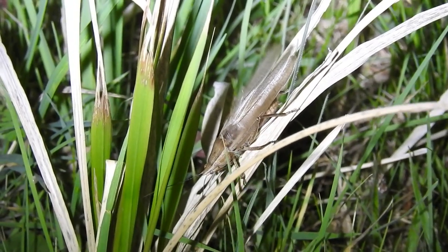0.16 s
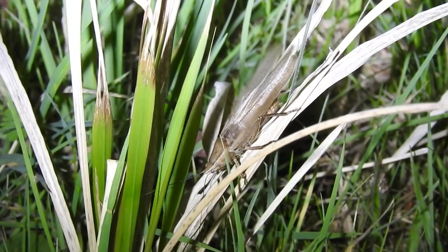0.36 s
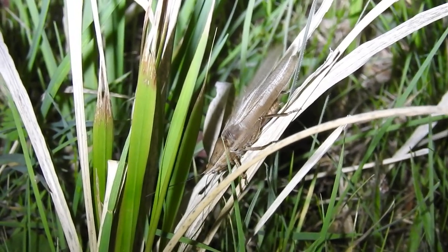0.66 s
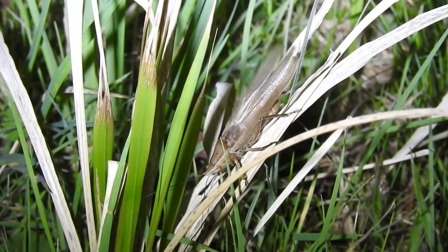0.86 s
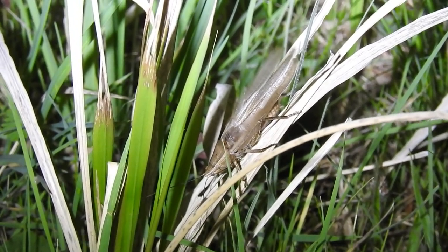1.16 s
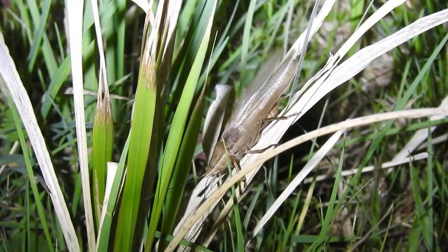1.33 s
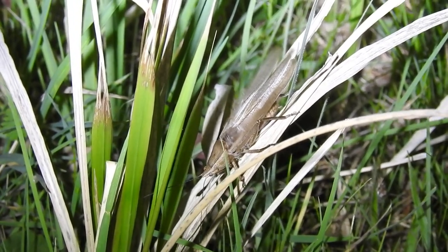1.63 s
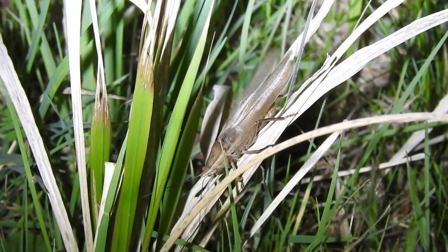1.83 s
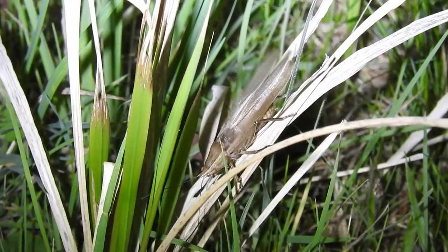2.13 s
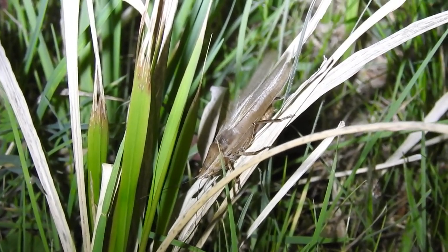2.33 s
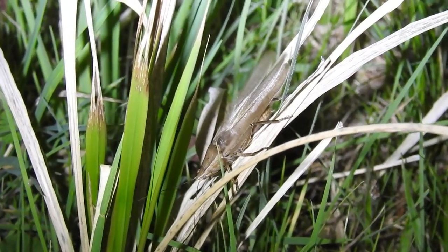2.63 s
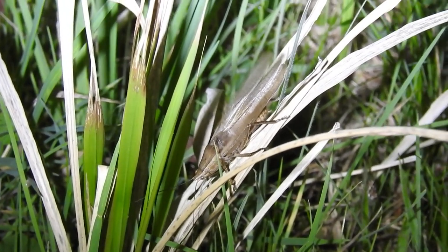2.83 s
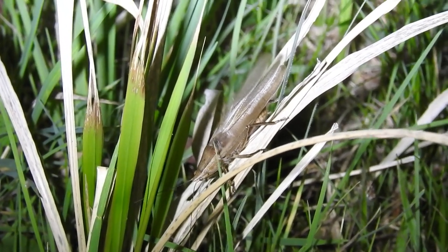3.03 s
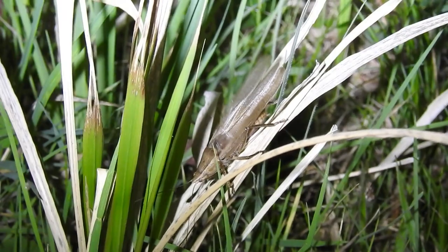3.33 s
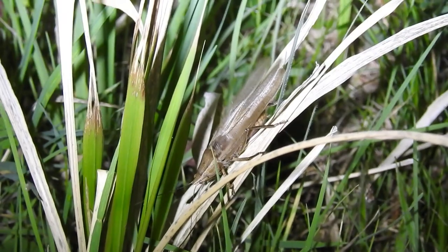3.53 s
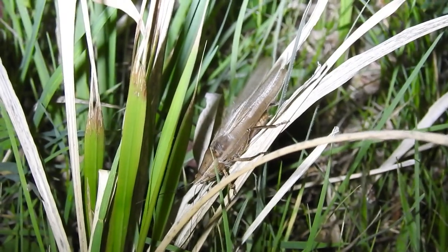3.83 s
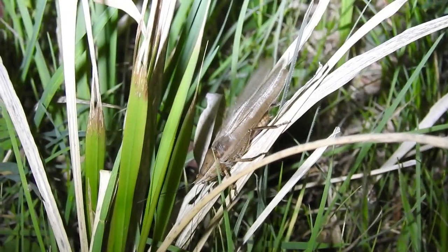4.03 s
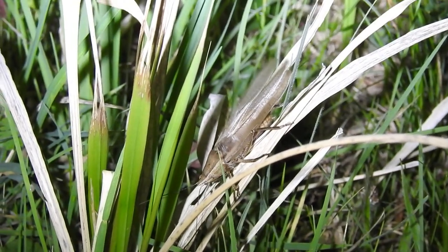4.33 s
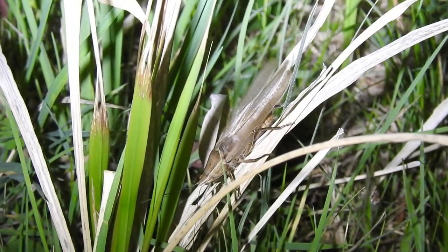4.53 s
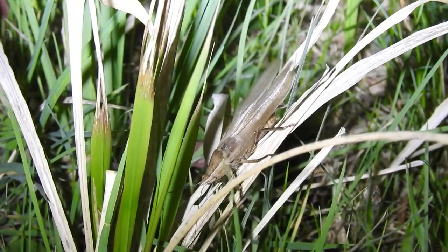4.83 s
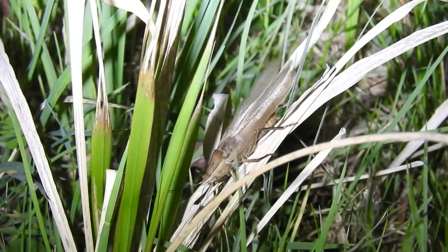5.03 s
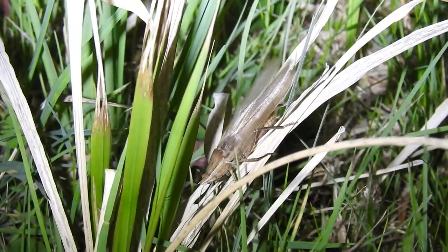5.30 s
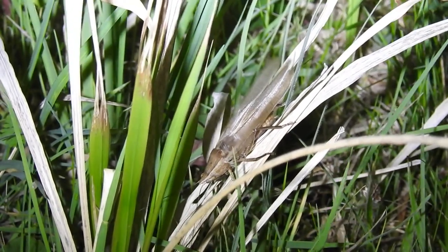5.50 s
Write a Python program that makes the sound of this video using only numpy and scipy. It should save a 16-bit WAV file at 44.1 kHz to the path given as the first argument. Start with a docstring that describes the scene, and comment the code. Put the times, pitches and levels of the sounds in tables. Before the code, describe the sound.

A katydid among grass blades buzzes close to the microphone from beginning to end, about eighty-two strokes a second fused into a harsh, bright drone. Each stroke is a tiny falling whistle with dry scraping grit. Pace and loudness hardly change; small irregular catches roughen it. Underneath lie a faint low wing hum, thin hiss and distant rumble. Outdoors at night, open and dry, in stereo, with only faint grassy echoes.

```python
"""A katydid sings close by in tall grass at night, about 82 wing beats a second.
Each closing stroke drags a scraper over a file: a short whistle sweeps from about 10 down to 7 kHz, then up a little.
Skids on landing, a light brush between strokes, dry grit and a few ticks come with it.
The beating wings push the air as a faint low hum; the grass returns faint echoes of the song.
Behind it lie a low distant rumble that swells once and a thin hiss, both shaped noise."""
import sys
import numpy as np
from scipy import signal
from scipy.fft import rfft, irfft
from scipy.io import wavfile

SR = 44100
rng = np.random.default_rng(int(sys.argv[2]) if len(sys.argv) > 2 else 0)


def master_out(mix):
    """Clip the mix to full scale and print it as 16-bit PCM to the path in sys.argv[1]."""
    frames = np.transpose(np.atleast_2d(mix))
    ceiling = np.clip(frames, -1, 1)
    pcm = np.round(ceiling * 32767).astype(np.int16)
    wavfile.write(sys.argv[1], SR, pcm)


N = 249606
LIFT_MS = 6.33  # the scraper lifts off the file this long into a stroke


def gain_of(db):
    """Decibels to amplitude gain."""
    return 10 ** (np.asarray(db) / 20)


def evened(x):
    """Scales to rms 1."""
    return x / np.sqrt(np.mean(x ** 2) + 1e-20)


def read(points, hz, axis=1):
    """Interpolates one table column on a log-frequency axis."""
    table = np.transpose(points)
    return np.interp(np.log(hz + 1), np.log(table[0] + 1), table[axis])


def filtered(x, spectrum):
    """Applies a (freq_hz, level_db) curve as a zero-phase filter."""
    curve_db = read(spectrum, np.fft.rfftfreq(N, 1 / SR))
    return irfft(rfft(x) * gain_of(curve_db), N)


def coloured(x, spectrum):
    """Shapes x by a spectrum, then scales it to rms 1."""
    return evened(filtered(x, spectrum))


def wander(hz):
    """Gaussian low-passed noise at rms 1; hz is the 1/e cutoff."""
    f = np.fft.rfftfreq(N, 1 / SR)
    lowpass = np.exp(-(f / hz) ** 2)
    return evened(irfft(rfft(rng.standard_normal(N)) * lowpass, N))


def noise_band(hz, width_hz):
    """Bell-shaped noise band around hz at about rms 1; width_hz is the 1/e half width."""
    turn = 2 * np.pi * hz * np.arange(N) / SR
    return wander(width_hz) * np.cos(turn) + wander(width_hz) * np.sin(turn)


def burst(time, at, width):
    """Bell-shaped swell around one moment; width is the 1/e half length."""
    return np.exp(-((time - at) / width) ** 2)


def per_stroke(stroke):
    """One normal random value per stroke, held while it lasts."""
    return rng.standard_normal(stroke[-1] + 1)[stroke]


def night(rumble_db=-60.5, drift_db=1.3, hiss_db=-44):
    """Low distant rumble that drifts and swells once, under a thin steady hiss."""
    # left-right likeness of the night air: freq_hz, likeness_0_to_1
    likeness = [(25, .4), (60, 0.5), (130, 1), (500, 0.78), (1200, 1), (16000, 0.38)]
    # distant rumble, relative density: freq_hz, level_db
    rumble_spectrum = [(15, -16), (35, -11), (65, 0), (110, -0.5), (190, -4.5), (240, -15), (350, -24),
                       (700, -32.5)]
    # thin hiss, relative density: freq_hz, level_db
    hiss_spectrum = [(100, -32), (400, -17.5), (1000, -15.5), (2500, -19), (3900, -8.5), (4400, -13.5),
                     (5500, 1), (7300, 11.5), (10000, -9), (12500, 8.5), (16000, -18)]
    swell_at_s, swell_half_s, swell_peak_db = 4.56, 0.39, 3.5

    left, other = rfft(rng.standard_normal((2, N)))
    same = np.clip(read(likeness, np.fft.rfftfreq(N, 1 / SR)), 0, 1)
    right = same * left + np.sqrt(1 - same ** 2) * other
    pair = irfft(np.array([left, right]), N)

    swell_db = swell_peak_db * burst(np.arange(N) / SR, swell_at_s, swell_half_s)
    moving_db = swell_db + drift_db * wander(4)
    lean = gain_of([[1], [-1]])  # rumble 1 dB up on the left, 1 dB down on the right
    rumble = gain_of(rumble_db + moving_db) * coloured(pair, rumble_spectrum) * lean
    return rumble + gain_of(hiss_db) * coloured(pair, hiss_spectrum)


def grass(x, level_db=-23, t60_s=0.44):
    """Blades and ground return a short spray of faint echoes, different on each side."""
    t_s = np.arange(SR // 8) / SR
    taps = rng.standard_normal((2, len(t_s))) * gain_of(-60 * t_s / t60_s)
    taps /= np.linalg.norm(taps, axis=1, keepdims=True)
    return gain_of(level_db) * signal.fftconvolve(x[None], taps, axes=1)[:, :N]


def hum(beats, lean_db=1.7):
    """Air pushed to and fro at the wing beat and its multiples; the lowest lean most to the left."""
    # air pushed by the wings, before the lean: beat_multiple, rms_db
    harmonics = [(1, -58.5), (2, -59.5), (3, -77.5), (4, -77), (5, -83), (6, -85.5), (7, -80), (8, -84.5),
                 (10, -82.5)]
    sides = np.array([[1], [-1]])
    total = 0
    for k, db in harmonics:
        peak = gain_of(db + sides * lean_db / k) * np.sqrt(2)
        total = total - peak * np.cos(2 * np.pi * round(k) * beats)
    return total


def wings(jitter_ms=.055):
    """Wing motion: beats done so far, current stroke number, and ms since that stroke began."""
    # pace of the wings: time_s, beat_rate_hz
    pace = [(0, 82.787), (.4, 82.349), (1.3, 82.301), (2.0, 82.758), (4.2, 82.402), (4.95, 81.692),
            (5.4, 82.358)]
    t_s = np.arange(N) / SR
    beats = np.cumsum(np.interp(t_s, *np.transpose(pace))) / SR
    now_ms = t_s * 1000
    count = np.arange(int(beats[-1]) + 1)
    starts_ms = np.interp(count, beats, now_ms) - .2
    starts_ms += jitter_ms * rng.standard_normal(len(count))
    stroke = np.maximum(np.searchsorted(starts_ms, now_ms) - 1, 0)
    return beats, stroke, now_ms - starts_ms[stroke]


def ticks(boost_db=21):
    """A tooth catches: single sharp clicks, low-passed at 7 kHz."""
    # catches, level before boost and low-pass: start_s, level_db
    catches = [(0.863, -42), (1.179, -46), (1.191, -47), (1.713, -46), (2.052, -44), (2.463, -46),
               (3.189, -42), (4.463, -42), (5.012, -49), (5.256, -45), (5.305, -44.5)]
    clicks = np.zeros(N)
    for s, db in catches:
        clicks[round(s * SR)] = gain_of(db + boost_db)
    return signal.lfilter(*signal.butter(2, 7000, fs=SR), clicks)


def grit(stroke, force, level_db=-47, uneven_db=1.0, grain_db=4):
    """Dry grainy rubbing: noise that follows the squared force of each stroke."""
    # grit of the rubbing file, relative density: freq_hz, level_db
    file_spectrum = [(250, -20), (1000, -12.5), (2300, -12), (3200, -7.5), (3900, -3), (4300, -4.5),
                     (5000, -1.5), (5600, 1.5), (6200, 0), (12000, 4), (16000, -27)]
    grains = rng.standard_normal(N) * gain_of(grain_db * np.clip(wander(2900), -3, 3))
    stroke_gain = gain_of(uneven_db * np.clip(per_stroke(stroke), -2, 2))
    rub = grains * force ** 2 * stroke_gain
    return gain_of(level_db) * coloured(rub, file_spectrum)


def opening(stroke, ms, level_db=-21.0, uneven_db=4.0, ring_hz=7350, rasp_db=-13):
    """The wings brush lightly on their way back: one short ring with some rasp."""
    brush_at_ms, brush_half_ms = 9.6, .55
    hz = ring_hz * (1 + .02 * per_stroke(stroke))
    phase = 2 * np.pi * (np.cumsum(hz) / SR + per_stroke(stroke))
    ring = np.cos(phase) + gain_of(rasp_db) * noise_band(9000, 1700)
    stroke_gain = gain_of(level_db + uneven_db * per_stroke(stroke))
    return stroke_gain * burst(ms, brush_at_ms, brush_half_ms) * ring


def landing(stroke, ms, usual_db=-26.5, hard_db=3, uneven_db=3, drift_db=3.0, skid_hz=10700):
    """The scraper skids for a moment as it meets the file, now and then much harder."""
    # strokes that land hard, level before hard_db: start_s, level_db
    hard_landings = [(0.3381, -22), (0.5447, -22), (0.5691, -20), (0.836, -24), (0.9088, -20),
                     (2.7985, -22), (3.0769, -20), (3.5254, -17), (4.0587, -21), (5.3867, -20)]
    peak_ms, half_width_hz = .5, 1800
    skid_db = usual_db + uneven_db * np.clip(per_stroke(stroke), -2, 2) + drift_db * wander(12)
    for s, db in hard_landings:
        mid_stroke = min(round((s + .004) * SR), N - 1)
        skid_db[stroke == stroke[mid_stroke]] = db + hard_db
    age = np.maximum(ms, 0) / peak_ms
    touch = age ** 3 * np.exp(3 * (1 - age))
    return gain_of(skid_db) * touch * noise_band(skid_hz, half_width_hz)


def tooth_rate(ms):
    """Teeth struck a second: the scraper slows along the file, then speeds up as it comes free."""
    land_hz, slowest_hz, lift_hz = 10830, 6980, 7650
    slowest_ms, braking = 5.25, .738  # exponent below 1: brakes hardest at first
    slowed = np.clip(ms / slowest_ms, 0, 1) ** braking
    freed = np.clip((ms - slowest_ms) / (LIFT_MS - slowest_ms), 0, 1) ** 2
    return land_hz + (slowest_hz - land_hz) * slowed + (lift_hz - slowest_hz) * freed


def pressure(ms):
    """The scraper presses ever harder, eases off, and lifts; 1 at its greatest."""
    bite_ms, press_ms, build_exponent = .2, 4.75, .654
    ease_db_per_ms, release_db_per_ms = 3, 13
    attack = np.clip((ms - bite_ms) / (press_ms - bite_ms), 0, 1) ** build_exponent
    ease_db = ease_db_per_ms * np.maximum(ms - press_ms, 0)
    release_db = release_db_per_ms * np.maximum(ms - LIFT_MS, 0)
    return attack * gain_of(-(ease_db + release_db))


def onset(stroke, ms):
    """The whistle starts a varying fraction of a millisecond into each stroke, rising from 0 to 1."""
    onset_ms, spread_ms, rise_ms = 0.37, 0.19, 0.16
    starts_ms = onset_ms + spread_ms * per_stroke(stroke)
    return np.clip((ms - starts_ms) / rise_ms, 0, 1)


def closing(stroke, ms, song_db=-3.0, uneven_db=0.47, flutter_db=0.3948, octave_db=-26):
    """The scraper runs down the file, one cycle per tooth; returns whistle and force."""
    stroke_spread, slip = .002, .005  # shares of pitch: between strokes, within a stroke
    effort = gain_of(uneven_db * per_stroke(stroke) + flutter_db * wander(1340))
    force = effort * pressure(ms) * onset(stroke, ms)
    hz = tooth_rate(ms) * (1 + stroke_spread * per_stroke(stroke) + slip * wander(1317))
    # the scraper lands anywhere on a tooth, so each stroke has its own phase
    phase = 2 * np.pi * (np.cumsum(hz) / SR + per_stroke(stroke))
    # octave only near the height of the stroke
    octave = gain_of(octave_db) * effort * burst(ms, 5.2, 1.12) * np.cos(2 * phase)
    return gain_of(song_db) * force * np.cos(phase) + octave, force


def colour_song(x):
    """Song colour: a high-pass, then gentle peaks and dips across the treble."""
    # song colour: freq_hz, gain_db
    song_colour = [(5500, 0.5), (6000, 3), (6500, 0.5), (7300, -0.5), (8000, 1), (8400, -1), (9100, 1),
                   (9500, -3.5), (10200, 4.5), (10700, 3), (11000, 3.5), (12500, -5), (14100, 0.5),
                   (14750, -1.5), (15100, 1), (15800, 9)]
    highpass = signal.butter(6, 5400, "high", fs=SR, output="sos")
    return filtered(signal.sosfiltfilt(highpass, x), song_colour)


def stereo_lean(x):
    """Places the song: level and phase differ between left and right by frequency."""
    # left against right: freq_hz, left_minus_right_db, left_lead_rad
    sides = [(5800, -0.4, 0.02), (6500, -3.7, 0.34), (6900, -0.2, 0.69), (7300, 3.3, 0.37),
             (7800, 2.7, 0.26), (8500, 4.4, 0.27), (9050, 6.4, -0.15), (9500, 3.3, -0.22),
             (10300, 2.9, -0.23), (10750, 0.0, -0.14), (11500, 1.4, 0.03), (13000, -0.2, -0.21)]
    hz = np.fft.rfftfreq(N, 1 / SR)
    lean = gain_of(read(sides, hz) / 2) * np.exp(.5j * read(sides, hz, axis=2))
    pair = np.array([lean, 1 / lean])
    return irfft(rfft(x) * pair / abs(pair.mean(0)), N)


def scene():
    """One wing motion drives the song, its grit and the hum."""
    beats, stroke, ms = wings()
    whistle, force = closing(stroke, ms)
    song = colour_song(whistle + landing(stroke, ms) + opening(stroke, ms))
    direct = stereo_lean(song + grit(stroke, force) + ticks())
    return direct + grass(song) + hum(beats) + night()


def record(dry):
    """Band limit: a linear-phase low-pass at 15.9 kHz."""
    lowpass = signal.firwin(511, 15900, window=("kaiser", 9), fs=SR)
    return signal.oaconvolve(dry, lowpass[None], "same")


dry = scene()
out = record(dry)
master_out(out)
```